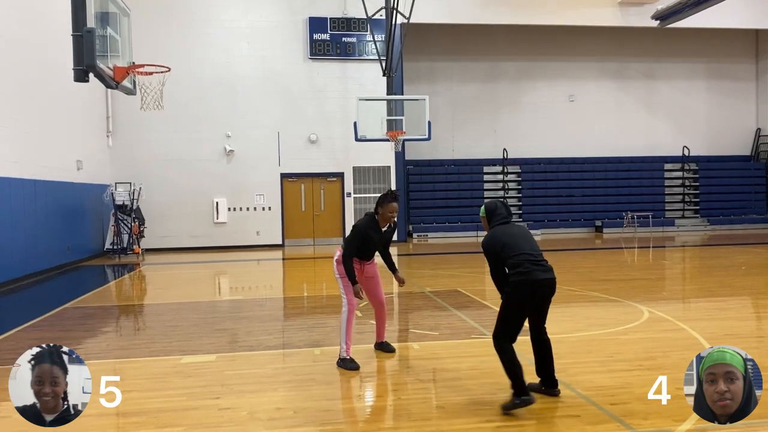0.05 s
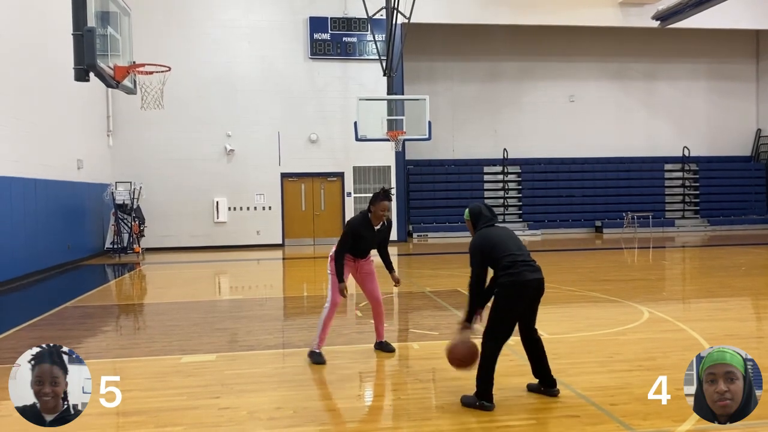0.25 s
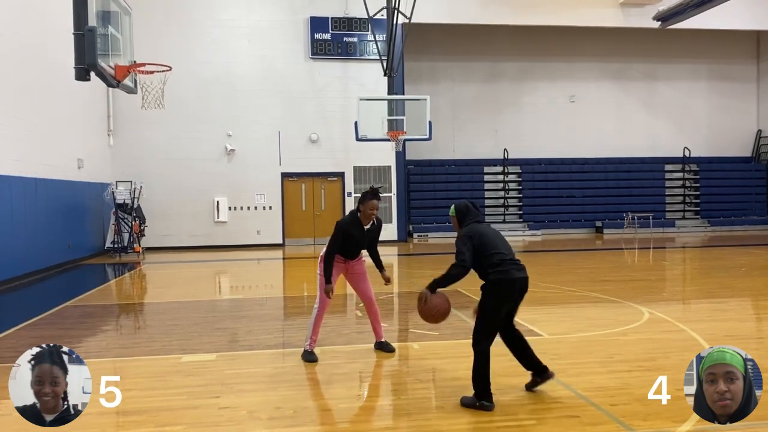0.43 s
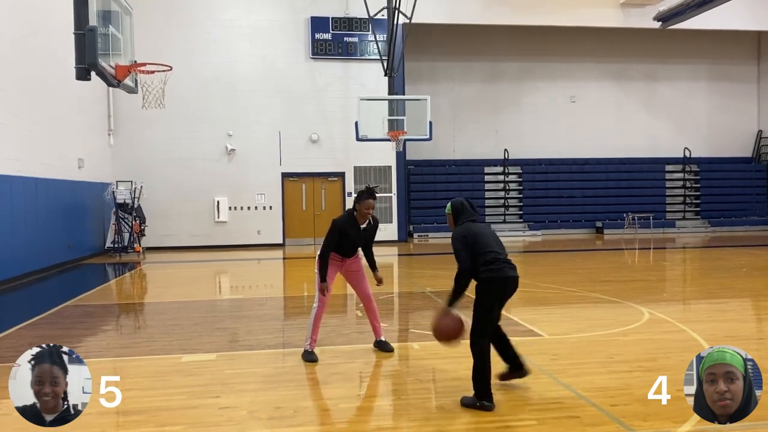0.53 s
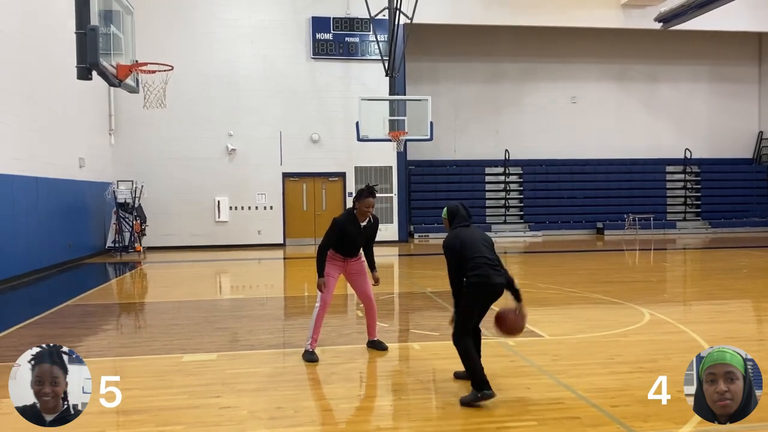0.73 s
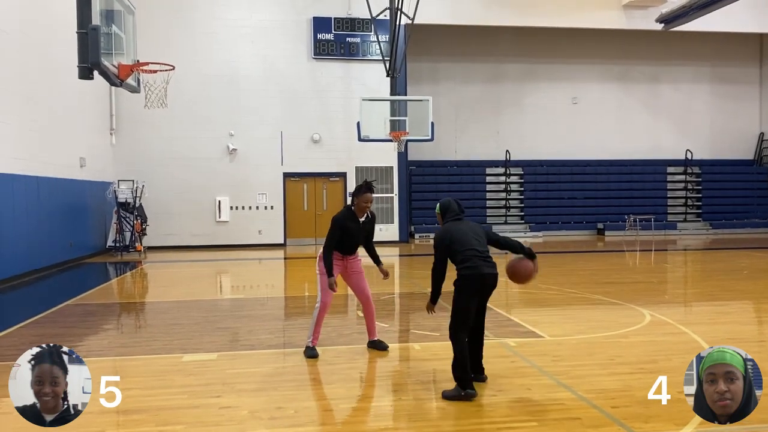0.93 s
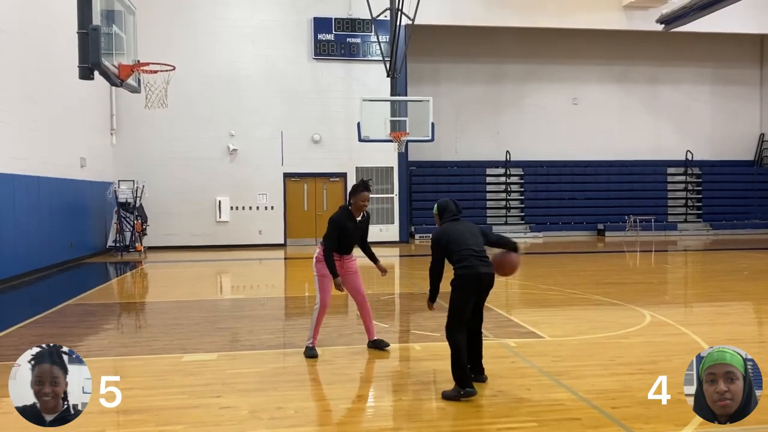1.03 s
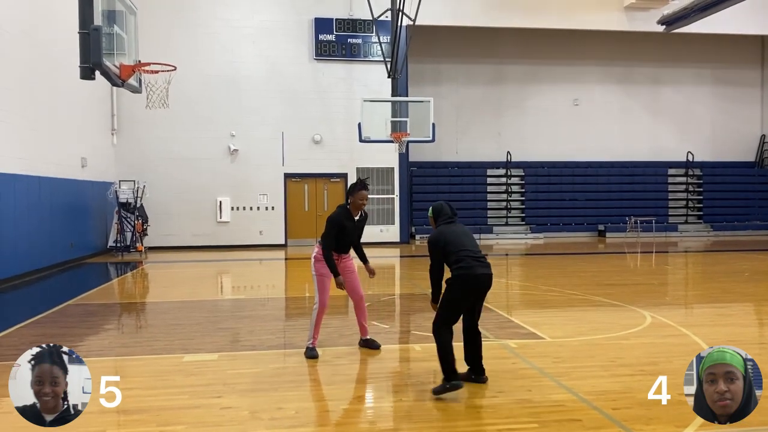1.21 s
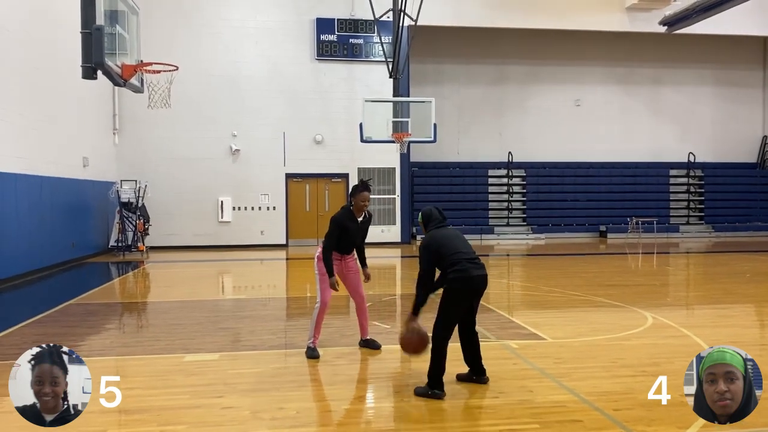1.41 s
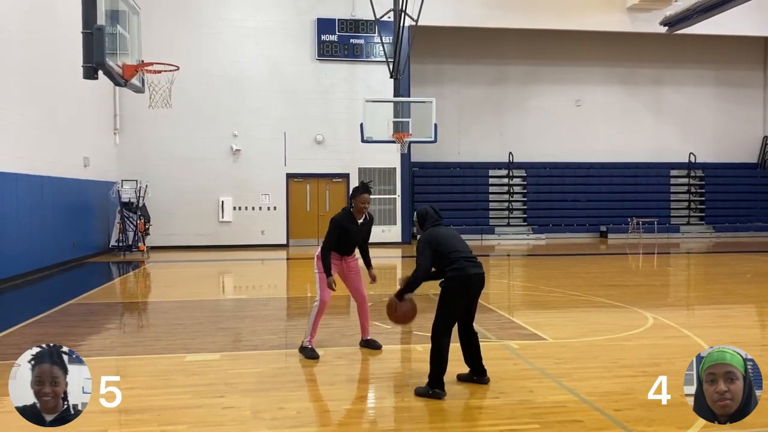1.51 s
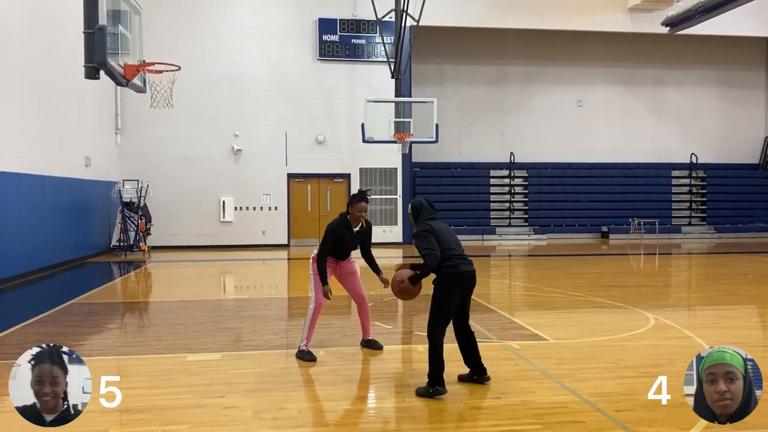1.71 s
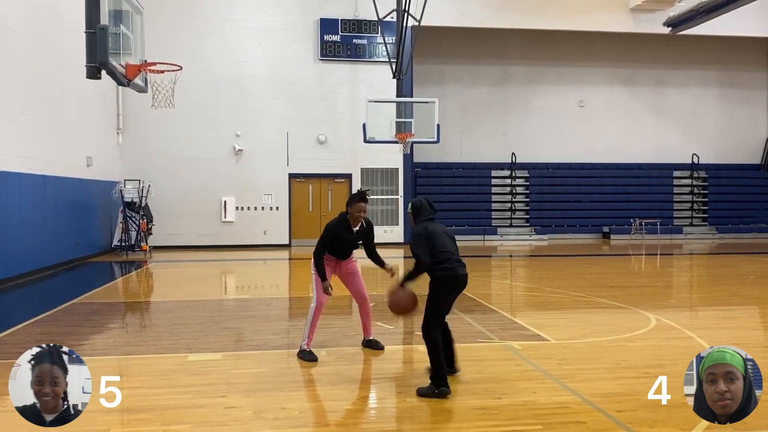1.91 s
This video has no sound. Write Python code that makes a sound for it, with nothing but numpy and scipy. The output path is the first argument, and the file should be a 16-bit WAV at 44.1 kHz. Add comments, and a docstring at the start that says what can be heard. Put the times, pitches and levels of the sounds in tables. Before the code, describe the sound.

Basketball dribble on sprung hardwood, three slapping thumps with long ringing echoes and soft footfalls

```python
"""A basketball is dribbled on the sprung wooden floor of a large gym, a few metres away.
Each bounce: a sharp slap (filtered click and scuff), a short ping of damped ball modes, a knock of
the boards, a floor thump that falls in pitch, a softer lift-off pop. Walls and ceiling echo it and
the hall rings on for seconds (shaped stereo noise). Shoes land softly between and after the bounces
(swelling noise, heel modes, faint thump); ventilation noise lies underneath."""
import sys
import numpy as np
from scipy import signal
from scipy.fft import rfft, irfft, next_fast_len
from scipy.io import wavfile
from scipy.ndimage import map_coordinates

SR = 44100
rng = np.random.default_rng(int(sys.argv[2]) if len(sys.argv) > 2 else 0)


def store_pcm(level_fs):
    """Save levels as 16-bit WAV."""
    pcm = np.round(np.clip(level_fs, -1, 1) * 32767).astype(np.int16)
    wavfile.write(sys.argv[1], SR, np.atleast_2d(pcm).T)


N = 85995
T = np.arange(N) / SR
BLOW_T = T[:SR // 8]  # time span of one blow
SIZE = next_fast_len(N + 6000)
HZ = np.fft.rfftfreq(SIZE, 1 / SR)

# bounces: t/s, thump level/dB, knock re thump/dB, slap level/dB, slap low-pass f/Hz, thump lag/s,
# lift-off delay/s, lift-off re slap/dB, thump echoes/dB, hall bass/dB, hall treble/dB
BOUNCES = [(0.2238, -8.5, -17, -3, 5830, 0.00019, .009, -28, -6.5, -25.5, -23),
           (0.6389, -12.5, -7, -13, 4140, 0.0032, .0098, 1.5, -7, -22.5, -31),
           (1.3573, -11.5, -8, -8.5, 7120, 0.00074, .008, -7.5, -5, -24.5, -25.5)]
# slap spectrum: f/Hz, level/dB
SLAP_SPECTRUM = [(60, -53.5), (400, 0), (780, -20.5), (1100, 2.5), (1400, 0), (1680, -4), (2050, -1.5),
                 (2550, -0.5), (3050, -11), (3450, 1), (4100, -4.5), (5200, -11), (6800, -10),
                 (9500, -24.5), (15500, -9)]
SCUFF_DB, SCUFF_T60_S = -19.5, 0.016
# air and shell of the ball: f/Hz, level re slap/dB, t60/s
BALL_MODES = [(750, -38.5, 0.28), (1055, -22.5, 0.081), (1222, -25.5, 0.043), (1506, -26.5, 0.045),
              (1915, -48, 0.13), (2040, -42, 0.053), (2330, -47, 0.021), (2534, -34, .08),
              (3494, -34, 0.057), (3990, -41, 0.071), (4805, -29.5, .025)]
LIFT_LOWPASS_HZ = 1450  # the ball peels off the boards with a softer pop
# bending waves in the boards: high ones arrive first
THUMP_START_HZ, THUMP_END_HZ, THUMP_SAG_S = 338, 65.4, 0.00976
THUMP_PEAK_S, THUMP_SHAPE = 0.011, 1.87  # time to peak; higher shape = shorter thump
# knock of the boards: f/Hz, level/dB, t60/s
BOARD_MODES = [(319, 1.5, 0.032), (374, -8, 0.045), (489, -8, 0.12)]

# near wall's answer, one row per bounce: delay/s, level re slap/dB
SIDE_WALL = [(.0201, -7), (.0212, -7), (.0186, -7)]
# near wall's reflection spectrum: f/Hz, level/dB
WALL_SPECTRUM = [(300, -12.5), (1200, -5.5), (2100, 3.5), (3200, -2.5), (5000, -2.5), (9000, 1.5),
                 (16000, -4.5)]
CORNER_S, CORNER_DB = .0066, -10  # second path, by way of floor and wall
WALL_SMEAR_T60_S, WALL_SMEAR_DB, RIGHT_LAG_S = .012, -11, .0004

# far surfaces: delay/s, thump level/dB, slap level/dB
ECHOES = [(0.0255, -6, -14.5), (.044, -0.5, -37.5), (.0885, -25, -33), (.1415, -15.5, -34),
          (.149, -20, -21.5), (.1695, -29.5, -26), (.205, -27, -27), (.229, -38.5, -23), (.237, -11, -27.5)]
# far surfaces' return of the thump: f/Hz, level/dB
ECHO_BASS = [(40, -1), (85, 1.5), (130, 8), (200, -10.5), (500, -4), (4000, -15)]
# bleachers and roof beams scatter the slap; the air dulls it
FAR_SMEAR_T60_S, FAR_CRISP_DB, FAR_LOWPASS_HZ = 0.032, -4, 8900

# bounce before the start, still ringing: age/s, hall bass/dB, hall treble/dB, low-pass f/Hz
EARLIER = (0.52, -19, -21, 6017)
# hall spectrum: f/Hz, level/dB
HALL_SPECTRUM = [(25, -43), (42, -32), (58, -11), (85, -14.5), (100, -1.5), (116, -2.5), (132, -4.5),
                 (155, -10.5), (210, -9.5), (310, -21.5), (430, -19.5), (720, -32.5), (1200, -30.5),
                 (2400, -33), (3050, -39), (3600, -39.5), (5300, -41), (7500, -40.5), (10500, -57.5),
                 (15500, -64)]
# hall decay: f/Hz, t60/s
HALL_T60 = [(60, 2.95), (120, 2.13), (400, 2.4), (1000, 1.1), (2300, 2.095), (4500, 2.05), (8000, 0.62),
            (15000, 1.83)]
# hall build-up: f/Hz, time constant/s
HALL_RISE = [(100, 0.0073), (300, 0.0039), (1000, 0.01), (3000, 0.0098), (8000, 0.011)]
# left-right correlation of diffuse sound: f/Hz, correlation/1
LIKENESS = [(60, 0.98), (125, 0.96), (250, 0.8), (500, 0.56), (1000, 0.0034), (2000, -0.12), (4000, 0.56),
            (8000, -0.32), (14000, 0.55)]
PING_IN_HALL_DB, PING_HALF_WIDTH_HZ = 5.5, 7  # the ping colours the reverberation
EARLY_DB, EARLY_S = 11.5, 0.013  # lift of the early reverberation, its time constant
CROSSOVER_HZ = 724  # hall bass below, treble above
FLUTTER_DB, FLUTTER_PER_S = 0.89, 53  # uneven level of the reverberation
# single reflections stand out in the treble until they merge
GRAIN_DB, GRAIN_PER_S, GRAIN_S = 1.6, 260, 0.43

# shoes landing or scuffing: t/s, pat level/dB, swell/s, low-pass f/Hz, hall level/dB,
# floor thump level/dB, heel knock level/dB; pat and heel are halved on use
STEPS = [(.669, -11.5, 0.0019, 2480, -28.5, -18, -17.5), (.688, -34, 0.0027, 2630, -36.5, -20.5, -35),
         (1.285, -32, 0.0028, 1670, -49.5, -45, -36), (1.4961, -39, 0.0038, 4457, -51.5, -48, -53),
         (1.9199, -33.5, .02, 2850, -69, -56, -43)]
# sole spectrum: f/Hz, level/dB
SHOE_SPECTRUM = [(60, -1.5), (140, 22.5), (280, 6.5), (500, 2.5), (900, 0), (2000, -8.5), (4000, -18),
                 (8000, -19), (16000, -9)]
# heel on the boards: f/Hz, level/dB, t60/s
HEEL_MODES = [(480, -11.5, 0.044), (700, -9.5, 0.034), (920, -3.5, 0.044), (1013, -9, 0.036),
              (1237, -10, 0.047)]

# ventilation spectrum: f/Hz, level/dB
AIR_SPECTRUM = [(25, -27), (60, 13), (120, 3), (250, -3.5), (420, -39), (800, -18), (2400, -26.5),
                (5000, -43.5), (8000, -44.5), (10000, -82), (16000, -77)]
AIR_DB = -36
BALANCE_DB, HALL_BALANCE_DB = -0.7, -0.2  # left gain; right gets the opposite
TOP_HZ = 16500


def dribble():
    """Every bounce: slap, knock, thump and lift-off pop, then wall, echoes and hall."""
    age_s, bass_db, treble_db, lowpass_hz = EARLIER
    out = hall(bass_db, treble_db, lowpass_hz, age_s)
    for bounce, (wall_s, wall_db) in zip(BOUNCES, SIDE_WALL):
        (t_s, thump_db, knock_db, slap_db, lowpass_hz, lag_s,
         lift_s, lift_db, boom_db, bass_db, treble_db) = bounce
        floor = thump() + amp(knock_db) * ring(BOARD_MODES)
        low = amp(thump_db) * late(floor, lag_s)
        high = amp(slap_db) * slap(lowpass_hz)
        pop = filtered(slap(lowpass_hz), causal(dull(LIFT_LOWPASS_HZ)))
        lift = amp(slap_db + lift_db) * late(pop, lift_s)
        direct = pan(BALANCE_DB) * (low + high + lift)
        wall = amp(wall_db) * late(side_wall(high), wall_s)
        echoes = far_echoes(amp(boom_db) * low, high)
        room = pan(HALL_BALANCE_DB) * (echoes + hall(bass_db, treble_db, lowpass_hz))
        out = out + late(direct + wall + room, t_s)
    return out


def slap(lowpass_hz):
    """Rubber meets wood: a crack, a brief scuff and the ping of the ball."""
    scuff_gain = amp(SCUFF_DB - 60 * BLOW_T / SCUFF_T60_S)
    contact = scuff_gain * rng.standard_normal((2, len(BLOW_T)))
    contact[:, 0] = -1  # crack
    colour = causal(amp(along(SLAP_SPECTRUM)) * dull(lowpass_hz))
    crack_peak = np.abs(irfft(colour, SIZE)).max()
    return filtered(contact, colour) / crack_peak + ring(BALL_MODES)


def thump():
    """The floor flexes: a few cycles that swell, die and sink in pitch."""
    hz = THUMP_END_HZ + (THUMP_START_HZ - THUMP_END_HZ) * np.exp(-T / THUMP_SAG_S)
    u = T / THUMP_PEAK_S
    swell = (u * np.exp(1 - u)) ** THUMP_SHAPE
    return -np.sin(2 * np.pi * np.cumsum(hz) / SR) * swell


def ring(modes):
    """Damped modes; sign and level vary a little at every blow."""
    x = 0
    for hz, db, t60_s in modes:
        sign = rng.choice([-1, 1])
        decay = amp(db + rng.normal() - 60 * BLOW_T / t60_s)
        x = x + sign * decay * np.sin(2 * np.pi * hz * BLOW_T)
    return np.pad(x, (0, N - len(x)))


def side_wall(high):
    """The near wall returns the slap twice, a little scattered, on the left first."""
    back = filtered(high, causal(amp(along(WALL_SPECTRUM))))
    corner = amp(CORNER_DB) * late(back, CORNER_S)
    scatter = amp(WALL_SMEAR_DB) * filtered(back, rfft(spray(WALL_SMEAR_T60_S), SIZE))
    left, right = back + corner + scatter
    return np.array([left, late(right, RIGHT_LAG_S)])


def far_echoes(low, high):
    """Ceiling and far walls return a filtered thump and a dulled slap, part crisp, part smeared."""
    boom = filtered(low, causal(amp(along(ECHO_BASS))))
    booms = sum(amp(db) * late(boom, s) for s, db, _ in ECHOES)
    crisp = amp(FAR_CRISP_DB) * (T == 0)
    walls = sum(amp(db) * late(spray(FAR_SMEAR_T60_S) + crisp, s) for s, _, db in ECHOES)
    return booms + filtered(high, rfft(walls, SIZE) * causal(dull(FAR_LOWPASS_HZ) ** 2))


def spray(t60_s):
    """Scatter off an uneven surface: decaying stereo noise, left energy 1."""
    x = rng.standard_normal((2, len(BLOW_T))) * amp(-60 * BLOW_T / t60_s)
    return np.pad(x / np.linalg.norm(x[0]), [(0, 0), (0, N - len(BLOW_T))])


def hall(bass_db, treble_db, lowpass_hz, age_s=0):
    """Reverberation of one bounce: diffuse noise, stronger at the ball's modes."""
    low = dull(CROSSOVER_HZ) ** 2
    peaks = sum(1 / (1 + ((HZ - hz) / PING_HALF_WIDTH_HZ) ** 2) for hz, _, _ in BALL_MODES)
    level_db = bass_db * low + treble_db * (1 - low) + PING_IN_HALL_DB * peaks
    colour = amp(level_db) * dull(lowpass_hz) ** .5
    return ring_out(diffuse(amp(along(HALL_SPECTRUM)), colour), age_s)


def ring_out(noise, age_s=0):
    """The hall builds up and dies at a speed set by frequency, its treble grainy at first."""
    hz, t, z = signal.stft(noise, SR, nperseg=512)
    rise = 1 - np.exp(-(t + age_s) / along(HALL_RISE, hz)[:, None])
    fall = amp(-60 * (t + age_s) / along(HALL_T60, hz)[:, None])
    tail = signal.istft(z * rise * fall, SR, nperseg=512)[1][:, :N]
    early_db = EARLY_DB * np.exp(-(T + age_s) / EARLY_S)
    tail = tail * amp(early_db + FLUTTER_DB * wobble(FLUTTER_PER_S))
    bass = filtered(tail, dull(CROSSOVER_HZ) ** 2)
    grain_db = GRAIN_DB * np.exp(-(T + age_s) / GRAIN_S) * wobble(GRAIN_PER_S)
    return bass + (tail - bass) * amp(grain_db)


def wobble(per_s):
    """A smooth random curve with per_s knots a second."""
    return map_coordinates(rng.standard_normal(1000), [T * per_s], mode="mirror")


def diffuse(gain, colour=1):
    """Stereo noise of rms about 1 from all sides, then coloured; mid/side split sets likeness."""
    turn = np.arccos(np.clip(along(LIKENESS), -.99, .99)) / 2
    split = np.array([np.cos(turn), np.sin(turn)])
    mid, side = filtered(rng.standard_normal((2, N)), gain * colour * split)
    return np.array([mid + side, mid - side]) / np.sqrt(np.mean(gain ** 2))


def steps():
    """Soles pat the boards, heels knock and flex them, and the hall stirs."""
    out = np.zeros((2, N))
    for t_s, pat_db, swell_s, lowpass_hz, hall_db, thump_db, knock_db in STEPS:
        colour = amp(along(SHOE_SPECTRUM)) * dull(lowpass_hz)
        pat = .5 * diffuse(colour) * T / swell_s * np.exp(1 - T / swell_s)
        wood = amp(thump_db) * thump() + .5 * amp(knock_db) * ring(HEEL_MODES)
        room = amp(hall_db) * ring_out(diffuse(colour))
        out += late(amp(pat_db) * pat + pan(BALANCE_DB) * wood + room, t_s)
    return out


def ventilation():
    """Steady diffuse air noise, mostly bass."""
    return amp(AIR_DB) * diffuse(amp(along(AIR_SPECTRUM)))


def amp(db):
    """Decibels to gain."""
    return 10 ** (np.asarray(db) / 20)


def along(points, hz=HZ):
    """(f/Hz, value) points interpolated on a log-frequency axis."""
    f, v = np.transpose(points)
    return np.interp(np.log(hz + 1), np.log(f + 1), v)


def filtered(x, response):
    """x times a response of frequency."""
    return irfft(rfft(x, SIZE) * response, SIZE)[..., :N]


def causal(gain):
    """Minimum-phase response with this gain, by folding the cepstrum."""
    c = irfft(np.log(np.maximum(gain, 1e-6)), SIZE)
    c[1:SIZE // 2] *= 2
    c[SIZE // 2 + 1:] = 0
    return np.exp(rfft(c))


def dull(hz):
    """Gain of a gentle low-pass, -3 dB at hz."""
    return (1 + (HZ / hz) ** 4) ** -.5


def late(x, s):
    """x delayed by s seconds."""
    lead = max(round(s * SR), 0)
    return np.pad(x, [(0, 0)] * (x.ndim - 1) + [(lead, 0)])[..., :N]


def pan(db):
    """Left and right gains, +db and -db."""
    return amp([[db], [-db]])


def scene():
    """Ball and shoes over the ventilation."""
    return dribble() + steps() + ventilation()


def record(dry):
    """Steep band limit: next to nothing above TOP_HZ."""
    return filtered(dry, 1 / (1 + (HZ / TOP_HZ) ** 240))


dry = scene()
out = record(dry)
store_pcm(out)
```